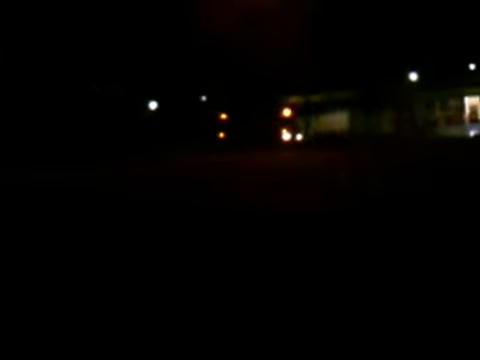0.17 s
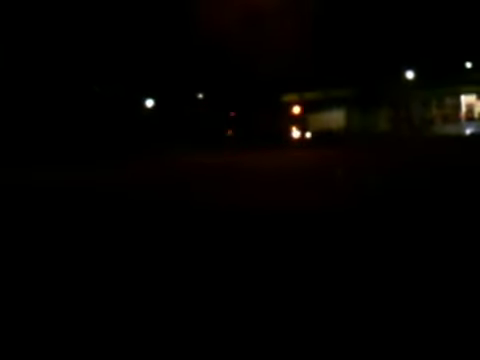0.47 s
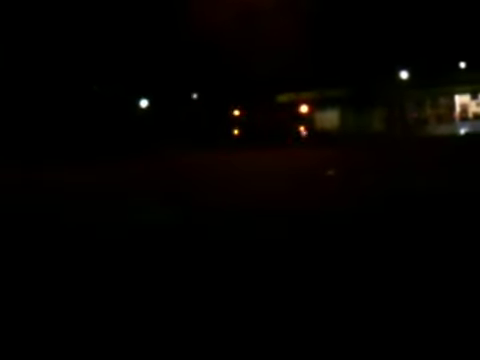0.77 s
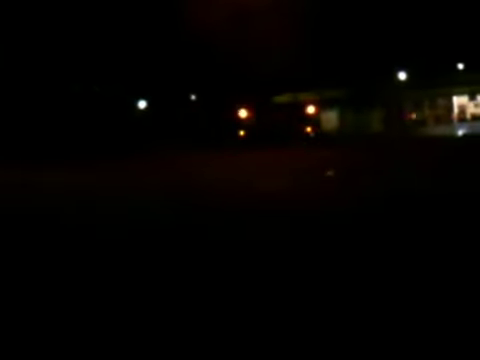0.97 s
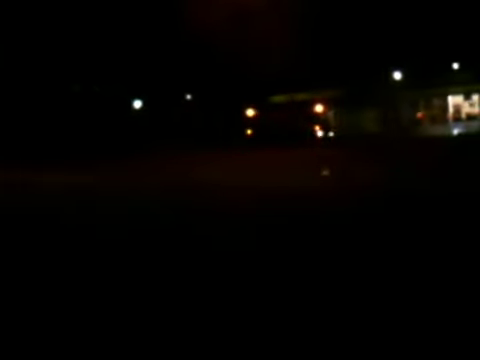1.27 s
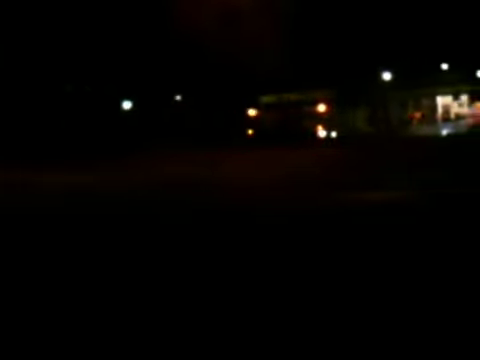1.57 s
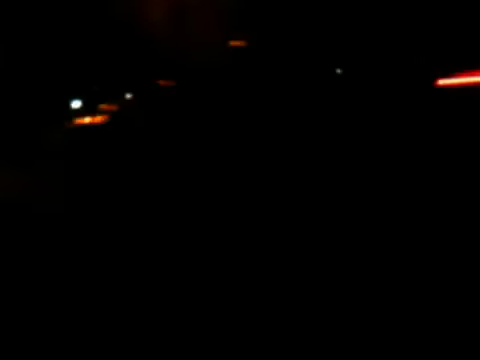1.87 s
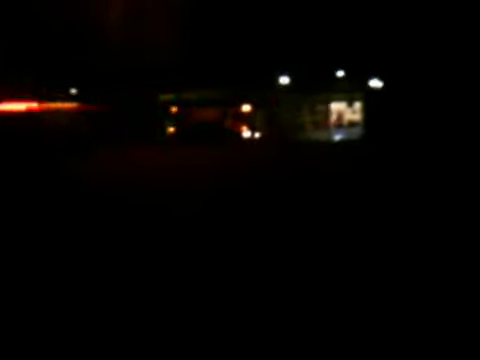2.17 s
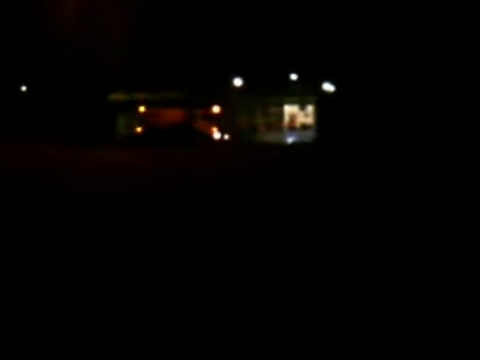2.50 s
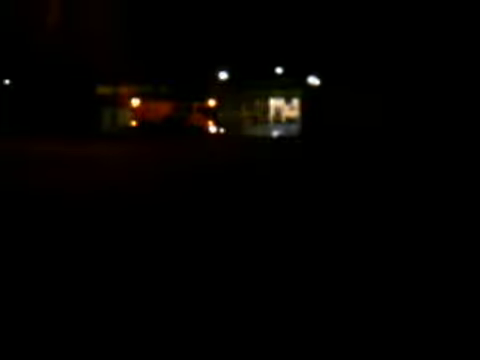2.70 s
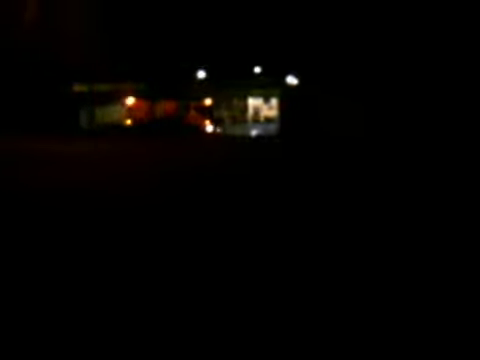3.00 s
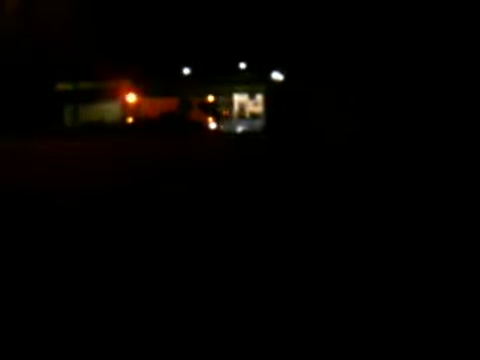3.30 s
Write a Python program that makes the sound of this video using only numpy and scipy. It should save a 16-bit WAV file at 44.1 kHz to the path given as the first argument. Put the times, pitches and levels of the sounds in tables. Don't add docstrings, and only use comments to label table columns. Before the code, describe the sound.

Distant street sweeper engine humming low while suction air roars and brushes scrub, dull and muffled.

```python
import sys
import numpy as np
from scipy import signal
from scipy.fft import rfft, irfft
from scipy.io import wavfile
from scipy.ndimage import uniform_filter1d

SR = 44100
rng = np.random.default_rng(int(sys.argv[2]) if len(sys.argv) > 2 else 0)


def materialize(psi):
    bounded = np.clip(np.atleast_2d(psi).T, -1, 1)
    quanta = np.round(bounded * 32767).astype(np.int16)
    wavfile.write(sys.argv[1], SR, quanta)


def natural_amplitude(level_db):
    exponent = np.asarray(level_db, float) / 20
    return 10 ** exponent


N = 152145
RATE_HZ = 8000


def evened(x):
    return x / np.sqrt(np.mean(x ** 2) + 1e-20)


def read(points, hz):
    f, value = np.transpose(points)
    return np.interp(np.log(hz + 1), np.log(f + 1), value)


def along(rows, t=None):
    if t is None:
        t = np.arange(N) / SR
    rows = np.array(rows)
    return [np.interp(t, rows[:, 0], column) for column in rows[:, 1:].T]


def slow(top_hz):
    t = np.arange(0, N + 128, 64) / SR
    drift = 0
    for fraction in np.geomspace(1 / 20, 1, 24):
        drift = drift + np.sin(2 * np.pi * (fraction * top_hz * t + rng.random())) / np.sqrt(fraction)
    return np.interp(np.arange(N) / SR, t, evened(drift))


def tone(hz):
    cycles = np.cumsum(hz * np.ones(N)) / SR
    return np.sqrt(2) * np.sin(2 * np.pi * (cycles + rng.random()))


def fuzzy(hz, width_hz):
    pole = np.exp(-np.pi * width_hz / SR)
    z = rng.standard_normal(N + SR) + 1j * rng.standard_normal(N + SR)
    for _ in range(2):
        z = signal.lfilter([1], [1, -pole], z)
    carrier = np.exp(2j * np.pi * np.cumsum(hz * np.ones(N)) / SR)
    return evened((z[SR:] * carrier).real)


def wash(shape, size, follows, patchy_db, flicker_db, scrubs=()):
    # start_s, level_db
    nearness = [(0, -1), (.3, 1), (.8, 0.9), (1.3, 2.94), (1.6, 3.06), (1.8, 2.2), (2.2, 2.7), (2.7, 2.5),
                (3.0, 2), (3.45, 2.6)]
    hop = size // 4
    frames = N // hop + 5
    t = np.arange(frames) * hop / SR
    hz = np.fft.rfftfreq(size, 1 / SR)[:size // 8, None]
    a, b, patches = rng.standard_normal((frames, len(hz), 3)).T
    patches = uniform_filter1d(patches, size=8, axis=0)
    patches = evened(uniform_filter1d(patches, size=10, axis=1))
    flicker = evened(uniform_filter1d(rng.standard_normal(frames), size=4))

    db = read(shape, hz) - 80 * (hz > RATE_HZ / 2)
    base = np.sqrt(np.mean(natural_amplitude(db) ** 2))
    db = db + follows * along(nearness, t)[0] + patchy_db * patches + flicker_db * flicker
    for s, half_s, centre_hz, octaves, boost_db in scrubs:
        in_time = ((t - s) / half_s) ** 2
        in_pitch = (np.log2((hz + 1) / centre_hz) / octaves) ** 2
        db = db + boost_db * np.exp(-in_time - in_pitch)

    z = np.zeros((size // 2 + 1, frames), complex)
    z[:len(hz)] = (a + 1j * b) * natural_amplitude(db) / base
    return signal.istft(z, nperseg=size, noverlap=size - hop)[1][:N] / np.sqrt(size / 2)


def rumble():
    # pitch_hz, level_db (per Hz)
    rumble_shape = [(15, -34), (32, -22), (42, -7.5), (120, -3.5), (200, -0.5), (270, -7), (305, -14),
                    (450, -32.5)]
    return natural_amplitude(-23.5) * wash(rumble_shape, size=4096, follows=1.04, patchy_db=-0.4, flicker_db=1.5)


def engine():
    # start_s, rate_hz, level_db
    firing = [(0.0, 53.3, -39.5), (0.1, 52.74, -44), (0.2, 51.1, -30.5), (0.28, 51.8, -39),
              (0.45, 52.1, -34.5), (0.92, 51.83, -44), (1.05, 50.37, -40), (2.16, 50.28, -36.5),
              (3.44, 50.7, -42), (3.45, 50.5, -53)]
    # multiple (of the rate), level_db
    orders = [(1, 0), (2, -9.5), (3, -9.5)]
    hz, db = along(firing)
    thump = np.zeros(N)
    for k, order_db in orders:
        voice = tone(k * hz) if k < 3 else fuzzy(k * hz, width_hz=3 * k)
        thump += natural_amplitude(db + order_db) * voice
    return thump


def exhaust_moan():
    # start_s, centre_hz, level_db
    moan = [(0, 205, -40), (.75, 205, -40), (.88, 214, -32), (1.03, 205, -41), (1.18, 213, -35),
            (1.32, 190, -41), (1.4, 188, -30), (1.52, 190, -30), (1.65, 200, -40), (1.85, 197, -37),
            (2.03, 199, -29), (2.33, 204, -29), (2.42, 198, -39), (2.65, 195, -33), (2.8, 195, -39),
            (2.92, 195, -27), (3.28, 204, -28), (3.38, 200, -38)]
    # start_s, centre_hz, level_db
    strand = [(0, 258, -33.5), (.5, 251.8, -39), (.9, 235.9, -34), (1.25, 245.5, -34), (1.55, 245, -42.5),
              (1.8, 262.9, -45), (2.45, 250.3, -37), (2.8, 275.3, -37.5), (3.2, 274, -30)]
    noise_share = 0.45
    out = np.zeros(N)
    for resonance in (moan, strand):
        hz, db = along(resonance)
        steady = np.sqrt(1 - noise_share) * tone(hz + 4.0 * slow(top_hz=15))
        breathy = np.sqrt(noise_share) * fuzzy(hz, width_hz=30)
        out += natural_amplitude(db - 1) * (steady + breathy)
    return out


def fans():
    # start_s, pitch_hz, level_db, beat_depth (0-1)
    blade = [(0, 353.5, -34, .7), (.25, 352, -32, .7), (.6, 352.3, -32, .75), (.78, 351.5, -29, .6),
             (.92, 352.5, -32, .25), (1.21, 352, -30, .15), (1.3, 352, -39, .3), (1.44, 351, -35, .2),
             (1.57, 350, -26, .1), (1.68, 350, -31, .1), (1.76, 351, -45, .1), (1.84, 350.3, -33, .2),
             (2.14, 351, -40, .3), (2.4, 350.5, -30, .2), (2.6, 350.5, -28, .1), (2.74, 350.8, -35, .1),
             (2.84, 350.2, -27.5, .15), (3.45, 351, -33, .45)]
    beat_hz, beat_top_s = 5.7, 0.77
    waver_hz, flutter_db = 1.2, 1.2
    hz, db, depth = along(blade)
    beat = 1 + depth * np.cos(2 * np.pi * beat_hz * (np.arange(N) / SR - beat_top_s))
    level = natural_amplitude(db + flutter_db * slow(top_hz=29.72))
    main = beat * level * tone(hz + waver_hz * slow(top_hz=12))
    neighbour = natural_amplitude(-45) * fuzzy(367.6, width_hz=4.3)
    return main + neighbour


def suction_and_brushes():
    # pitch_hz, level_db (per Hz)
    roar_shape = [(200, -26), (320, 0.5), (420, 1.5), (950, -2.5), (1400, -8.5), (1800, -9.5),
                  (2500, -15.5), (4000, -18)]
    # middle_s, half_length_s, centre_hz, width_octaves, boost_db
    brush_scrubs = [
        (.85, 0.47, 1600, 0.66, 4),
        (1.42, 0.14, 1480, 0.31, 2.5),
        (1.46, 0.027, 3764, .4, 2.5),
        (1.25, .07, 1380, .4, 6),
        (1.6, 0.4, 3100, 0.93, 4.5),
        (1.9, 0.29, 959, 0.14, 4.5),
        (2.15, .2, 1420, 0.71, 4),
        (3.3, 0.27, 592.7, 1, 1.5),
    ]
    return natural_amplitude(-25) * wash(roar_shape, size=1024, follows=0.9, patchy_db=0.5, flicker_db=0.05,
                           scrubs=brush_scrubs)


def scene():
    mix = rumble() + engine() + exhaust_moan() + fans() + suction_and_brushes()
    return mix[None]


def band_limit(x):
    return signal.sosfilt(signal.butter(12, 4780, fs=SR, output="sos"), x)


def record(dry):
    # pitch_hz, level_db
    roll_off = [(3300, -0.71), (3800, -2), (4000, -5.5), (4250, -17), (4500, -35.5), (4650, -57),
                (4800, -78)]
    mirrored = dry * (1 + 2 * np.cos(2 * np.pi * RATE_HZ * np.arange(N) / SR))
    both = np.concatenate([mirrored, mirrored[:, ::-1]], axis=1)
    hz = np.fft.rfftfreq(2 * N, 1 / SR)
    gain = natural_amplitude(read(roll_off, hz) - 60 * (hz > 5200))
    x = irfft(rfft(both) * gain)[:, :N]
    return band_limit(x - 0.0033)


dry = scene()
out = record(dry)
materialize(out)
```